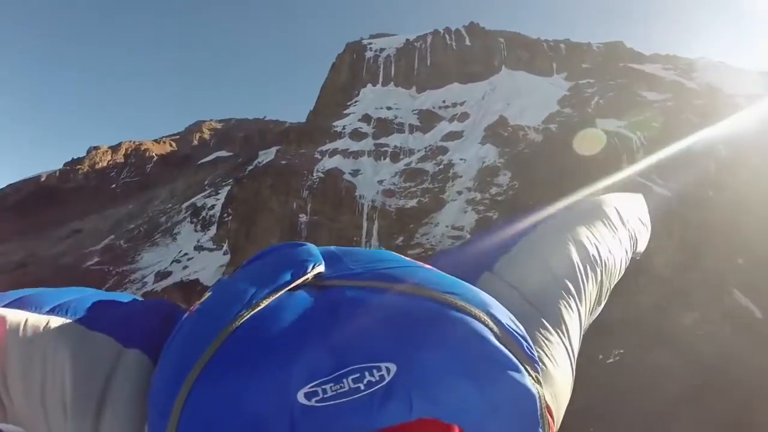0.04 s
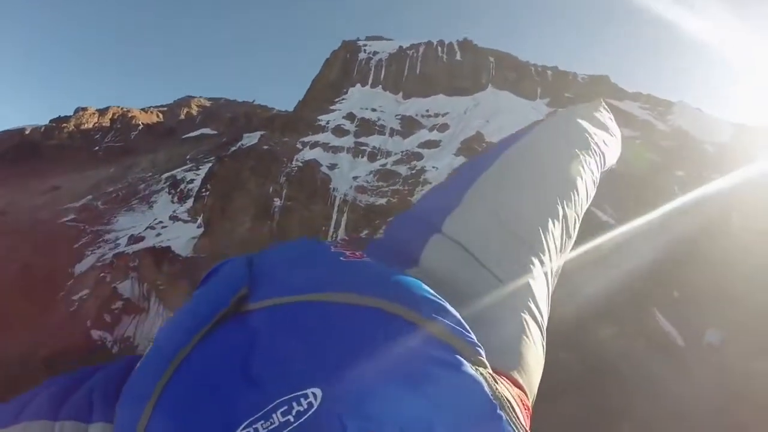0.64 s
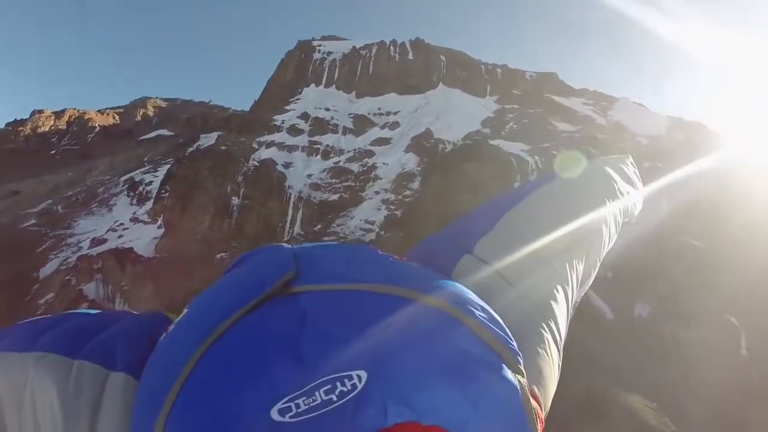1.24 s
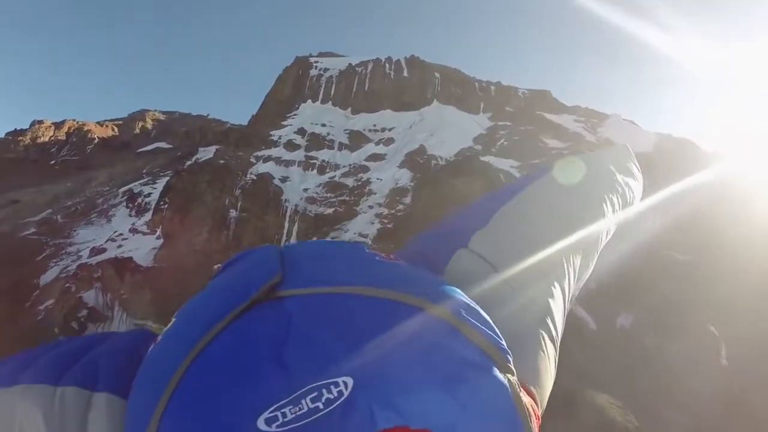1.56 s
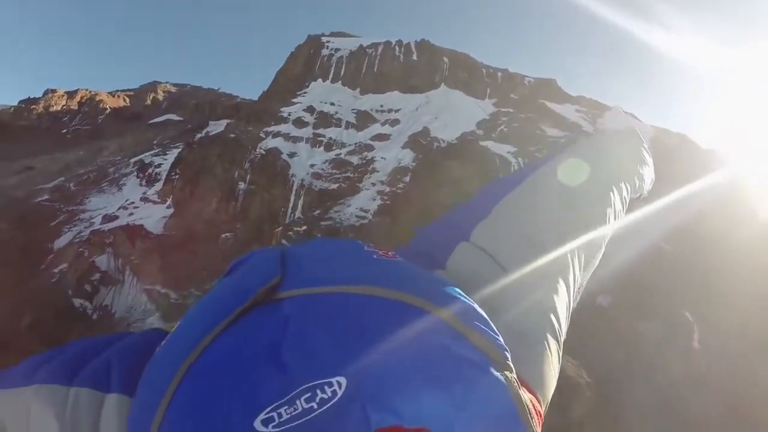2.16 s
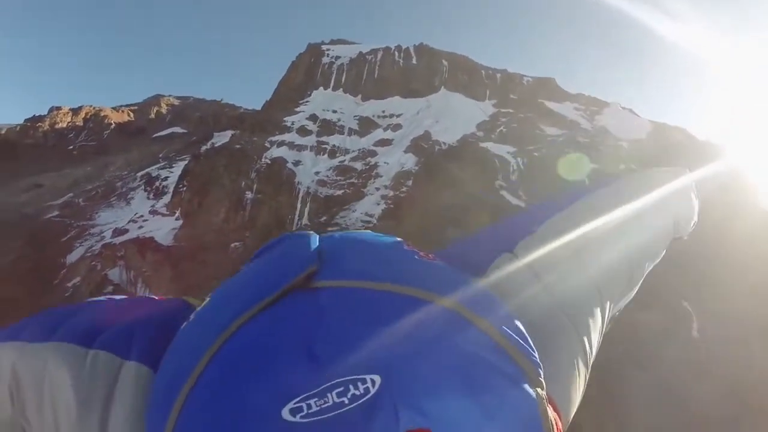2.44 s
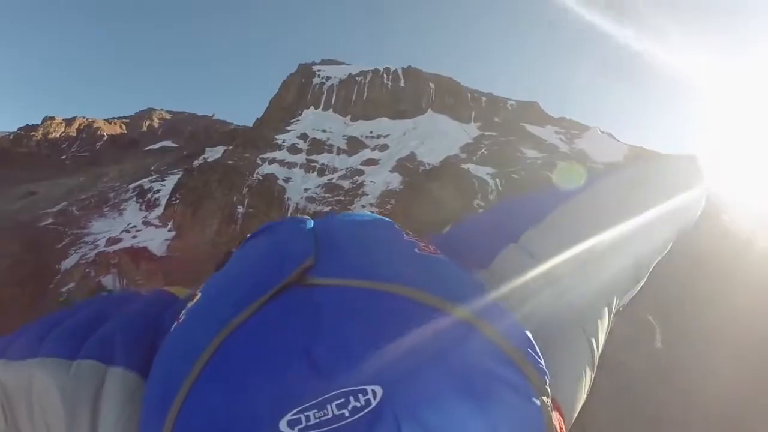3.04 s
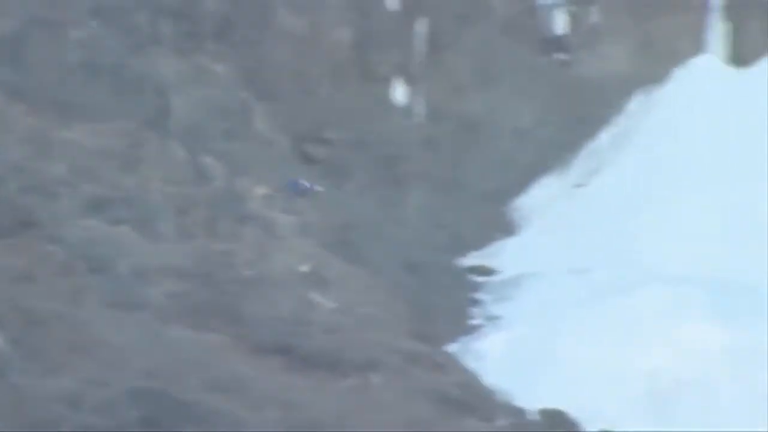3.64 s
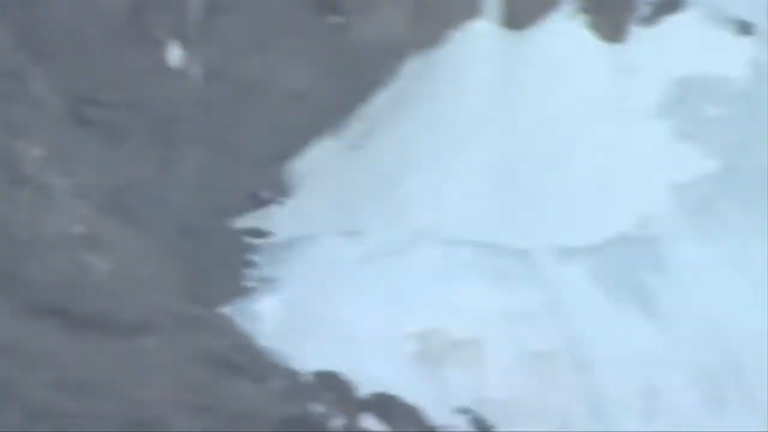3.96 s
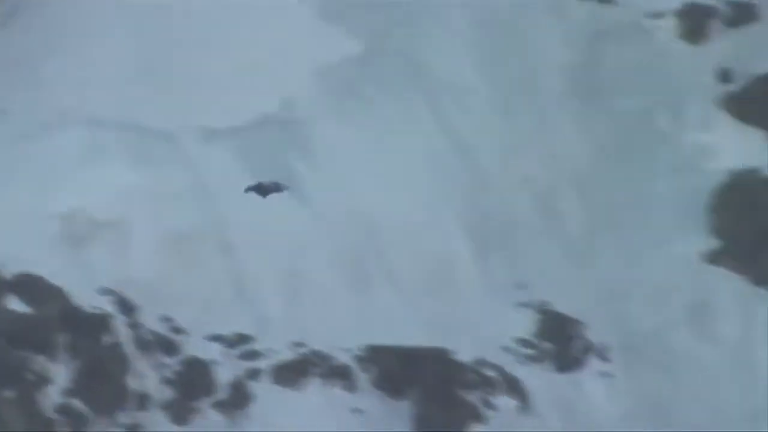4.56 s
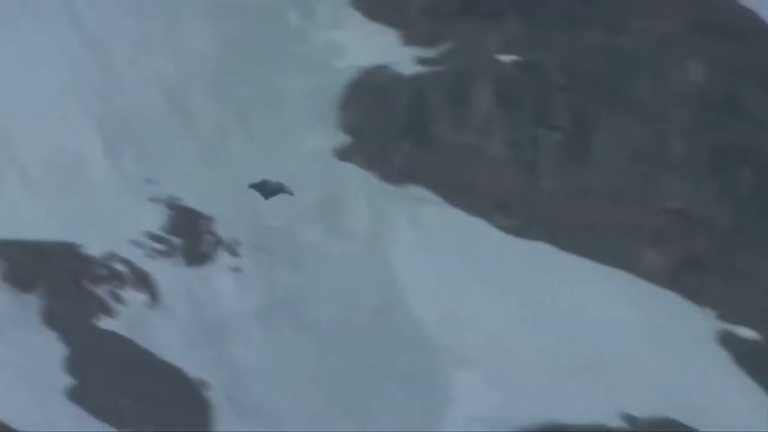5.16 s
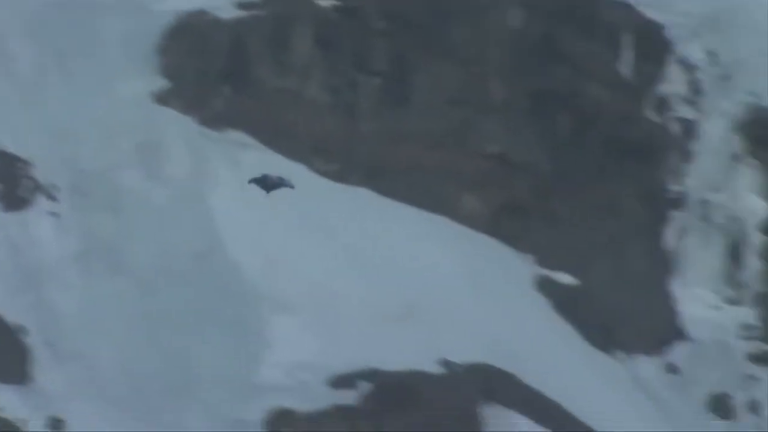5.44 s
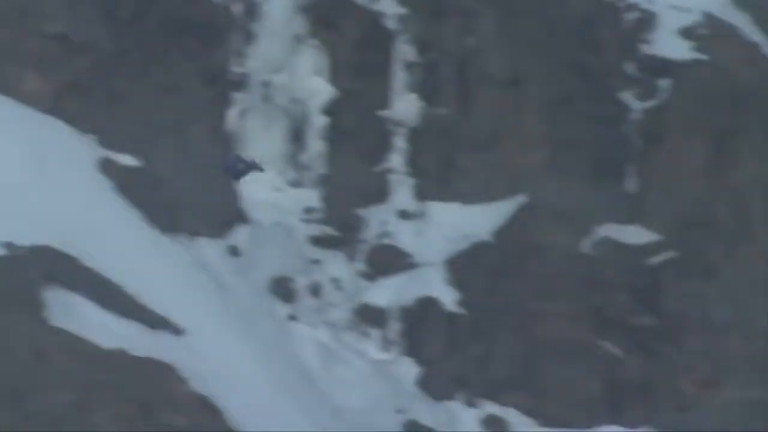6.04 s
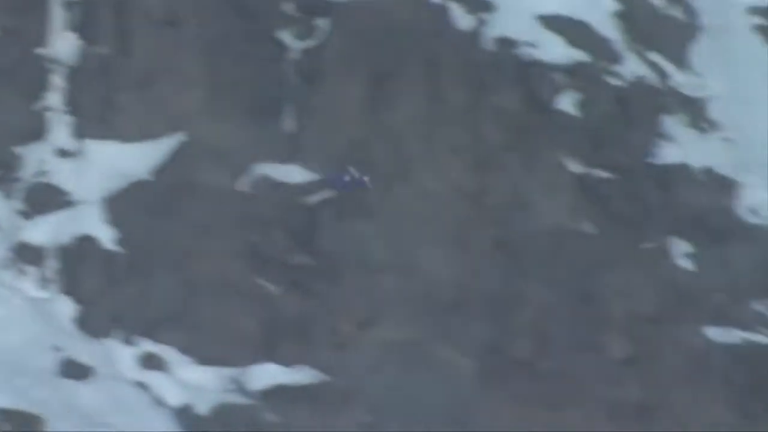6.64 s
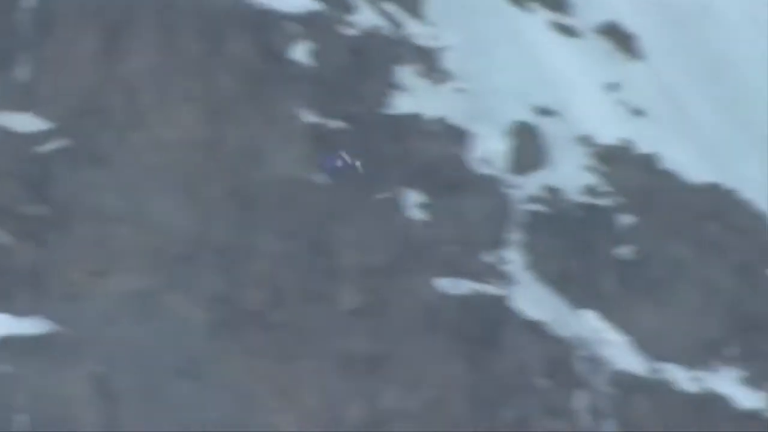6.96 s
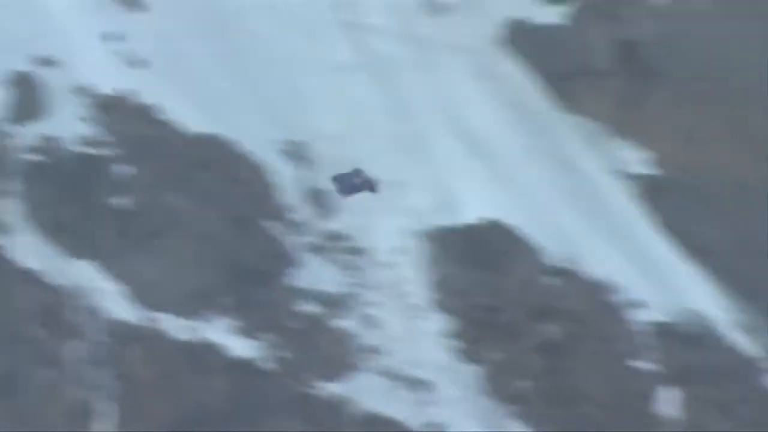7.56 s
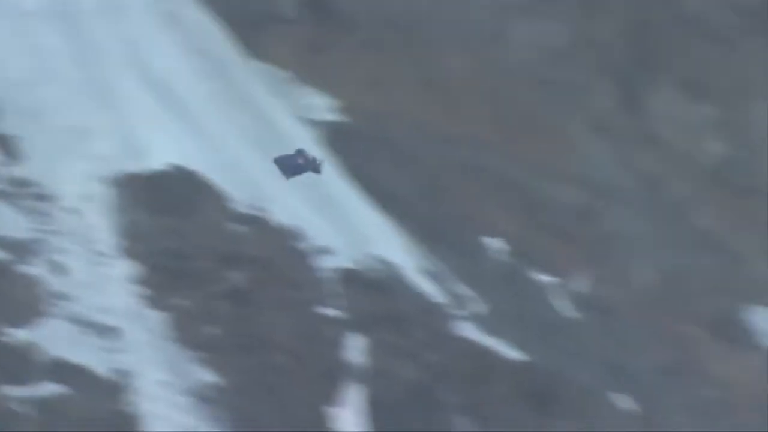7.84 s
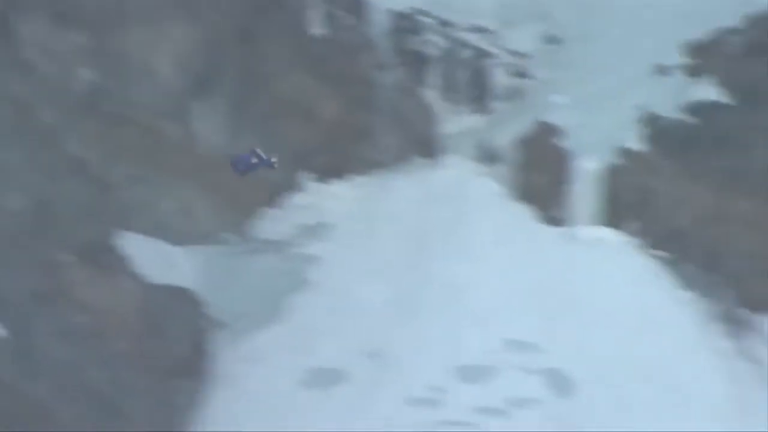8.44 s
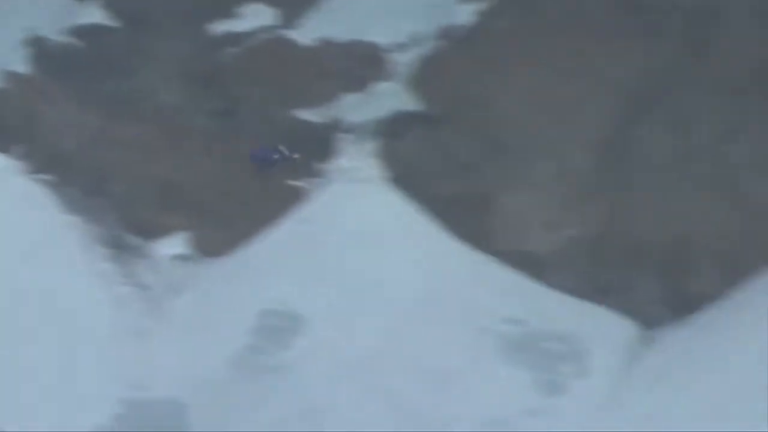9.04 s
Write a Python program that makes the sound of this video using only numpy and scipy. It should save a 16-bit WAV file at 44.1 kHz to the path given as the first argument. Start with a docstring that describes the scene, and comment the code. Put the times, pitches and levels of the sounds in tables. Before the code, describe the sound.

A wingsuit glide is heard from a helmet microphone right in the airflow: a loud, even rush of wind with low buffeting, a howl that flares now and then, and high whistling. After about three seconds everything abruptly becomes much quieter, as if turned down. The wind keeps the same character at a faint level, and brief, very high squeaks come shortly before the end.

```python
"""Wind tears past the helmet camera of a wingsuit flyer in a steady glide.
Eddies buffet the housing, and the rush and hiss ring its hollows. Two cavity tones howl and beat
against each other, while thin edges shed vortices that whistle and, near the end, squeak.
A third of the way in the volume is turned far down in one step, and the same wind goes on faintly."""
import sys
import numpy as np
from scipy import signal
from scipy.fft import rfft, irfft, next_fast_len
from scipy.io import wavfile

SR = 44100
rng = np.random.default_rng(int(sys.argv[2]) if len(sys.argv) > 2 else 0)


def bounce(signal):
    """Save signal as a 16-bit WAV file at the path given by the first command-line argument."""
    frames = np.transpose(np.atleast_2d(signal))
    limited = np.clip(frames, -1, 1)
    pcm = np.round(limited * 32767).astype(np.int16)
    wavfile.write(sys.argv[1], SR, pcm)


N = 410125
TIME = np.arange(N) / SR
FREQS = np.maximum(np.fft.rfftfreq(next_fast_len(N), 1 / SR), 1)

# Airflow over the helmet, driving buffet, rush and hiss. Each row: time in seconds, strength in dB.
AIRFLOW = [(0, -1.3), (0.6, -1.74), (1.55, -1.1), (2.0, -0.26), (3.1, 0.95), (3.3, -0.8), (4.55, 1.3),
           (5.3, -0.2), (6.05, -0.7), (6.35, 0.5), (6.8, -0.8), (7.5, 1), (7.8, -0.9), (8.7, -0.6),
           (9.3, 0.3)]
# Slow lean of the wind's colour. Each row: time in seconds, dB added to the rush and cut from the buffet.
WIND_TILT = [(0, 0.3), (2.0, 0.1), (3.2, -0.5), (4.8, 0.1), (6.3, 1), (7.6, 0), (9.3, 0)]
# The wind's low, middle and top layers. Each row: frequency in Hz, relative level in dB.
BUFFET_SPECTRUM = [(8, -26), (30, -2.5), (55, 0.5), (80, -1.5), (135, 2.5), (165, 0), (205, 1.5), (255, -8),
                   (340, -13.5), (440, -16.5), (540, -20), (900, -13.5), (2500, -70)]
RUSH_SPECTRUM = [(250, -55), (560, -28.5), (700, -22), (1020, -11.5), (1340, -4), (1560, -0.5), (1780, -1),
                 (2050, -0.5), (2210, -3), (2480, -3), (2650, -9), (3390, -7.5), (3900, -18), (5200, -44)]
HISS_SPECTRUM = [(2600, -35), (4000, -4.5), (4350, -0.5), (4820, -4), (5100, 0.5), (5400, -0.5), (6400, 0),
                 (7050, -0.5), (7550, -8.5), (8350, -12), (9900, -11.5), (10900, -16.5), (11900, -13),
                 (13100, -22.5), (14500, -20), (15500, -34)]
# Ringing hollows of the helmet and housing. Each row: centre in Hz, rough width in Hz, lift in dB.
HELMET_HOLLOWS = [(185.6, 20.5, 8), (452, 24, 3), (631.3, 24, 12), (811.6, 26, 11), (957, 46, 6),
                  (1445, 77, 6.5), (1567, 49, 2.5), (1953, 95, 3.5), (2382, 170, 6), (3090, 190, 2),
                  (4650, 56, 3.5), (8930, 500, 4.5)]
# The two howling cavity tones; the upper is a close pair.
# Each row: pitch in Hz, width in Hz, relative level in dB.
LOWER_CAVITY_MODES = [(1102.6, 49, 0)]
UPPER_CAVITY_MODES = [(1189.6, 55, -1), (1241, 60, -2)]
# The howl starts strong and settles. Each row: time in seconds, lower and upper tone levels in dB.
HOWL_LEVELS = [(0, -26.5, -24.5), (2.0, -24, -25.5), (3.6, -26, -30), (5.5, -28.5, -27), (7.2, -31, -30.5),
               (9.3, -29, -26.5)]
# The howl flares as air catches the cavities squarely.
# Each row: peak time in seconds, length in seconds, lower and upper tone lifts in dB.
HOWL_FLARES = [(0.346, 0.51, 2, 6.5), (1.25, 0.31, 4, 6.5), (2.22, 0.39, 6, 1.5), (4.25, .14, 4, 4),
               (7.8, 0.63, 7, 2), (8.39, 0.38, 6.5, 4), (8.684, 0.081, 9.5, 0)]
# The main edge whistle follows the air speed. Each row: time in seconds, pitch in Hz.
MAIN_EDGE_PITCH = [(0.0, 6270), (0.26, 6080), (1.68, 6030), (2.43, 6120), (3.39, 5880), (4.04, 6250),
                   (5.02, 6150), (7.07, 6290), (9.3, 6250)]
# It swells as air meets the edge squarely. Each row: peak time in seconds, length in seconds, lift in dB.
MAIN_EDGE_SWELLS = [(0.3, 1.2, 1), (2.15, .5, 3), (3.1, 1.5, 4.5), (3.97, .3, 4), (5.5, 0.6, 2.5),
                    (7.6, 1.3, 3.5)]
# An edge tone that sinks as it grows. Each row: time in seconds, pitch in Hz, level in dB.
FALLING_EDGE_PATH = [(0.4, 9840, -49), (2.05, 9400, -45), (2.7, 9020, -38.5), (3.85, 8850, -35.5),
                     (3.97, 9080, -43)]
# Thinner edges that whistle for a while. Each row: start, loudest moment and end in seconds,
# multiple of the main pitch, spread in Hz, peak level in dB.
THIN_EDGES = [(2.5, 3.35, 3.75, 2.475, 180, -43), (2.9, 4.0, 5, 1.92, 220, -49),
              (6.9, 7.3, 13, 1.11, 160, -36.5), (3.0, 8.0, 13, 1.655, 220, -47.5)]
# Squeaks from an edge that only just catches the air.
# Each row: peak time in seconds, length in seconds, pitch in Hz, level in dB.
EDGE_SQUEAKS = [(7.635,.03,13780,-42), (7.755,.065,13690,-43), (7.99,.02,13800,-47), (8.33,.035,13980,-39),
                (8.53,.06,14000,-41), (8.62,.04,14080,-39), (8.70,.075,14050,-38), (8.773,.05,14180,-40),
                (8.875,.02,14200,-45)]


def undb(db):
    """Decibels to gain."""
    return 10 ** (np.asarray(db) / 20)


def curves(table):
    """Each column after the time column as an automation line."""
    times, *columns = np.transpose(table)
    return [np.interp(TIME, times, column) for column in columns]


def noise(gain):
    """Noise of rms 1, coloured by a gain at each frequency."""
    size = next_fast_len(N)
    coloured = irfft(rfft(rng.standard_normal(size)) * gain, size)[:N]
    return coloured / coloured.std()


def wander(rate_hz):
    """A random drift of rms 1, mostly slower than the given rate."""
    return noise(1 / (1 + (FREQS / rate_hz) ** 2))


def resonance(hz, width_hz):
    """A resonant peak of height 1, its width taken at half height."""
    return 1 / (1 + ((FREQS - hz) / width_hz * 2) ** 2)


def swell(peak_s, length_s):
    """A smooth rise and fall of height 1 around a moment."""
    return np.exp(-(2 * (TIME - peak_s) / length_s) ** 2)


def turbulence(spectrum):
    """Air noise with a smooth colour, lifted where the hollows ring."""
    hz, db = np.transpose(spectrum)
    colour_db = np.interp(np.log(FREQS), np.log(hz), db)
    ring_db = sum(lift * resonance(centre, 2 * width) ** 2 for centre, width, lift in HELMET_HOLLOWS)
    return noise(undb(colour_db + ring_db))


def wind(eddies, buffet_db=-26.5, rush_db=-20, hiss_db=-29.5):
    """Low buffet throbs on its own; mid rush and hiss shake with the eddies. All grow with the flow."""
    flow_db, = curves(AIRFLOW)
    tilt_db, = curves(WIND_TILT)
    buffet = turbulence(BUFFET_SPECTRUM) * undb(buffet_db + 1.47 * flow_db - tilt_db + 1.25 * wander(3.6))
    rush = turbulence(RUSH_SPECTRUM) * undb(rush_db + 0.86 * flow_db + tilt_db + 0.72 * eddies)
    hiss = turbulence(HISS_SPECTRUM) * undb(hiss_db + 0.69 * flow_db + 0.5 * eddies)
    return buffet + rush + hiss


def cavity_howl(eddies, shake_db=1.0, drift_db=0.37):
    """Close cavity tones, blown by turbulence, beat roughly against each other and flare now and then."""
    flares_db = sum(np.outer(lifts_db, swell(peak, length)) for peak, length, *lifts_db in HOWL_FLARES)
    levels_db = curves(HOWL_LEVELS) + flares_db
    howl = 0
    for modes, level_db in zip((LOWER_CAVITY_MODES, UPPER_CAVITY_MODES), levels_db):
        power = sum((undb(db) * resonance(hz, width)) ** 2 for hz, width, db in modes)
        howl = howl + noise(np.sqrt(power)) * undb(level_db + drift_db * wander(3.9))
    return howl * undb(shake_db * eddies)


def whistle(hz, spread_hz, waver_hz, flutter_db=0.7):
    """Vortices shed from an edge: a fluttering narrow band of noise around a moving pitch."""
    phase = 2 * np.pi * np.cumsum(hz + waver_hz * wander(20.2)) / SR
    tone = wander(spread_hz) * np.cos(phase) + wander(spread_hz) * np.sin(phase)
    return tone * undb(flutter_db * wander(16))


def main_edge(hz, level_db=-33.5):
    """The main edge whistles throughout and swells when the air meets it squarely."""
    lift_db = sum(db * swell(peak, length) for peak, length, db in MAIN_EDGE_SWELLS)
    return whistle(hz, spread_hz=164, waver_hz=37.7) * undb(level_db + lift_db)


def caught(start_s, end_s, fade_s=0.04):
    """A gate, open while the air meets an edge at the right angle, with a quick fade on either side."""
    return np.exp(-np.abs(TIME - np.clip(TIME, start_s, end_s)) / fade_s)


def falling_edge():
    """A high edge whistle sinks and grows, then flicks up and lets go."""
    hz, db = curves(FALLING_EDGE_PATH)
    gate = caught(start_s=FALLING_EDGE_PATH[0][0], end_s=FALLING_EDGE_PATH[-1][0])
    return whistle(hz, spread_hz=155, waver_hz=41.6) * undb(db) * gate


def thin_edges(main_hz, fade_depth_db=11):
    """Thinner edges whistle in and fade away, riding the air speed at multiples of the main pitch."""
    whistles = np.zeros(N)
    for start, loudest, end, multiple, spread_hz, peak_db in THIN_EDGES:
        fade_db = fade_depth_db * np.interp(TIME, (start, loudest, end), (1, 0, 1))
        tone = whistle(multiple * main_hz, spread_hz, waver_hz=35)
        whistles += tone * undb(peak_db - fade_db) * caught(start, end)
    return whistles


def edge_squeaks(waver_hz=90):
    """A very high edge tone locks in for moments, its pitch shaken by the air."""
    squeaks = np.zeros(N)
    waver = waver_hz * wander(120)
    for peak, length, hz, db in EDGE_SQUEAKS:
        near = np.abs(TIME - peak) < length
        envelope = np.exp(-(2 * (TIME[near] - peak) / length) ** 4)
        phase = 2 * np.pi * np.cumsum(hz + waver[near]) / SR
        squeaks[near] += undb(db) * envelope * np.sqrt(2) * np.sin(phase)
    return squeaks


def scene():
    """Wind, howl and whistles at one microphone, alike in both ears."""
    eddies = 0.55 * wander(34) + 0.35 * wander(180)  # large slow eddies plus small quick ones
    edge_hz, = curves(MAIN_EDGE_PITCH)
    bed = wind(eddies) + cavity_howl(eddies)
    whistles = main_edge(edge_hz) + falling_edge() + thin_edges(edge_hz) + edge_squeaks()
    air = bed + whistles
    return np.array([air, air])


def record(dry, step_s=3.2056, step_db=-25, top_hz=15200):
    """The volume drops in one step and stays down; a steep low-pass trims the very top."""
    stepped = dry * undb(step_db * (TIME > step_s))
    low_pass = signal.ellip(10, 0.1, 80, top_hz, fs=SR, output="sos")
    return signal.sosfilt(low_pass, stepped)


dry = scene()
out = record(dry)
bounce(out)
```